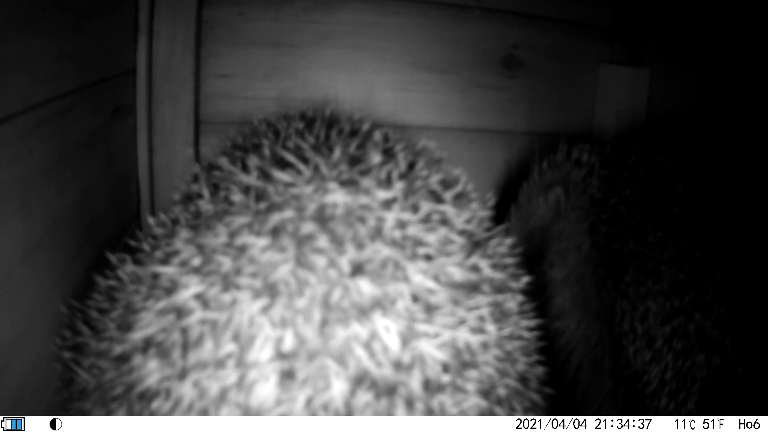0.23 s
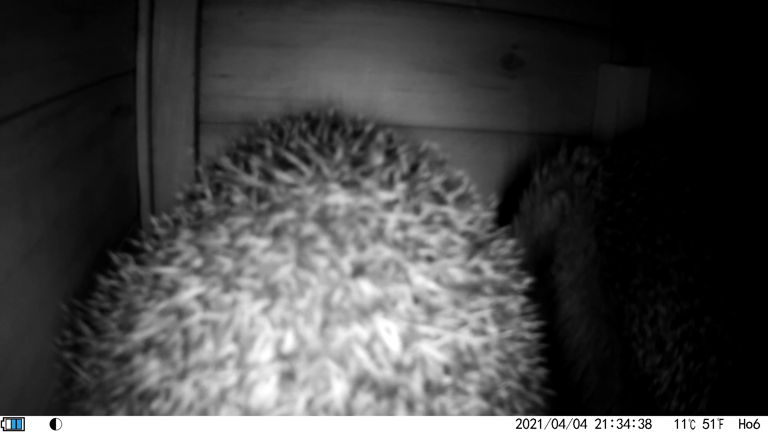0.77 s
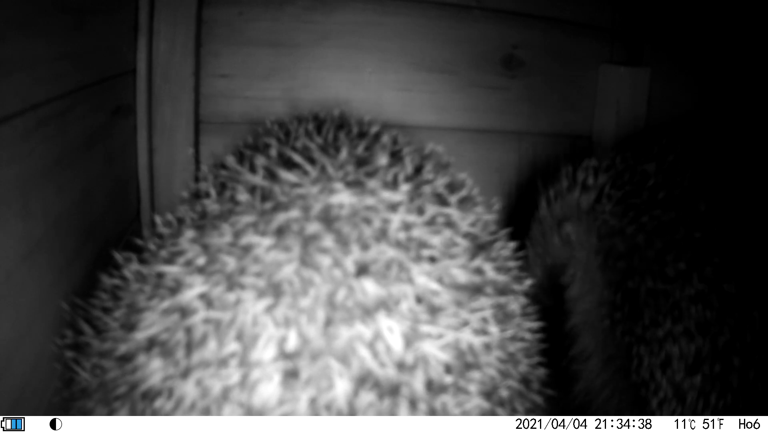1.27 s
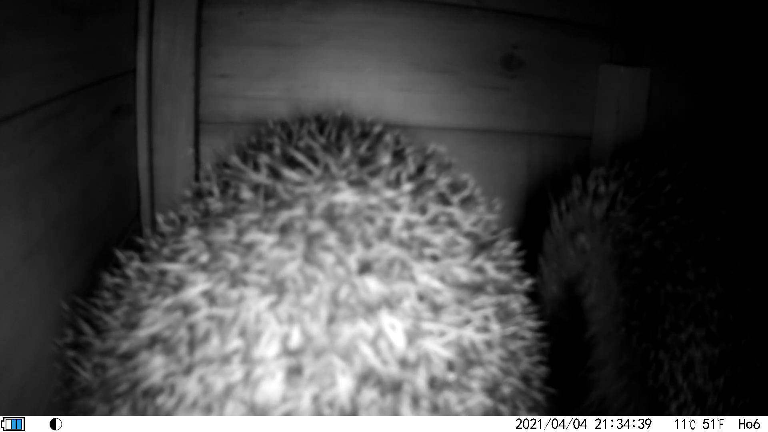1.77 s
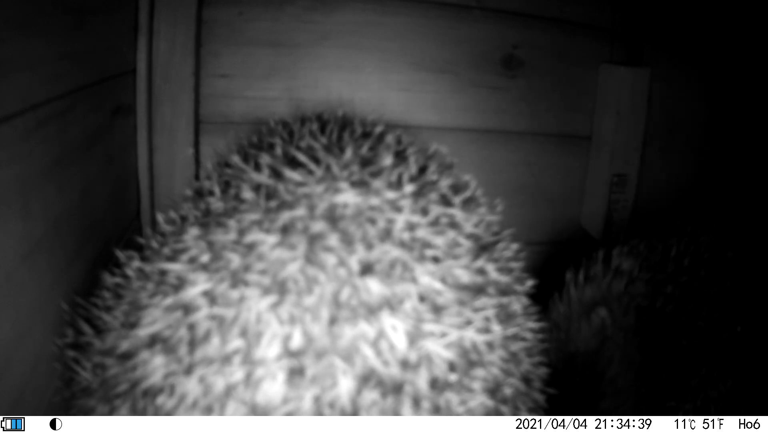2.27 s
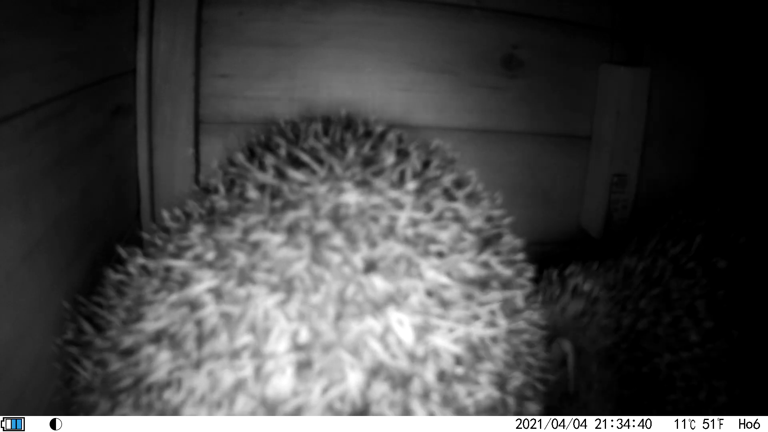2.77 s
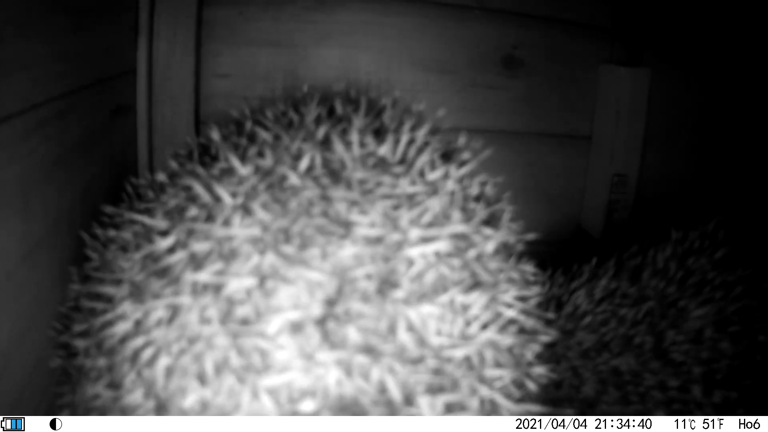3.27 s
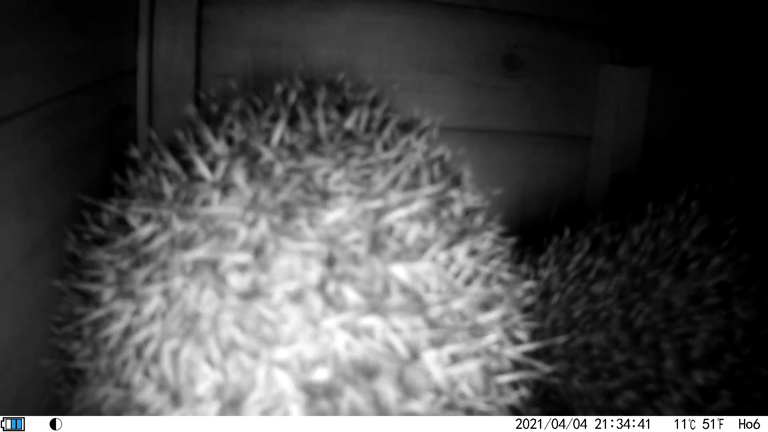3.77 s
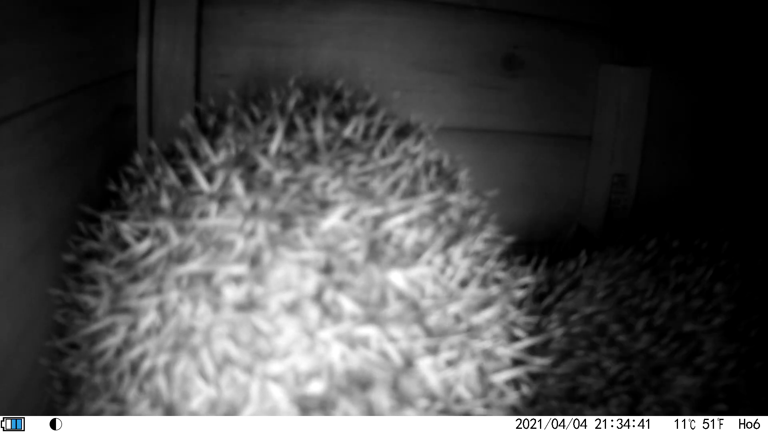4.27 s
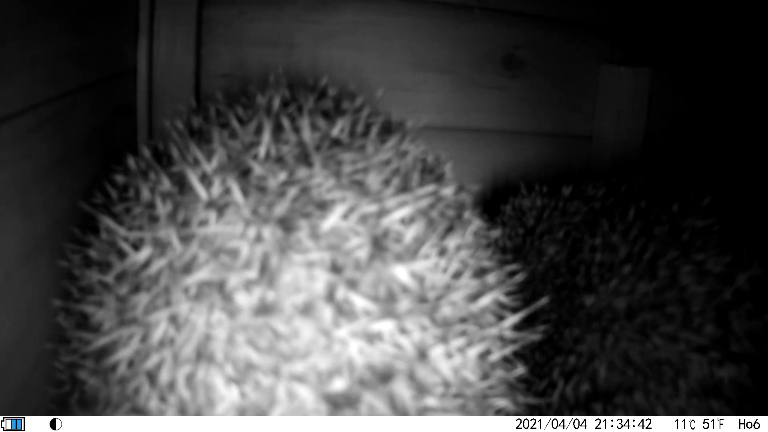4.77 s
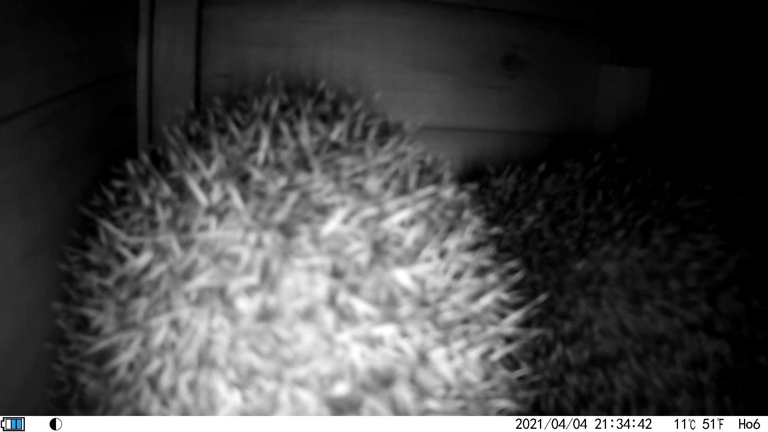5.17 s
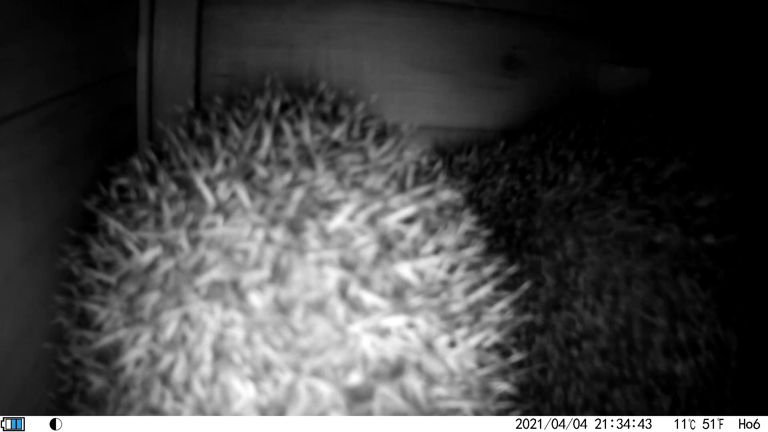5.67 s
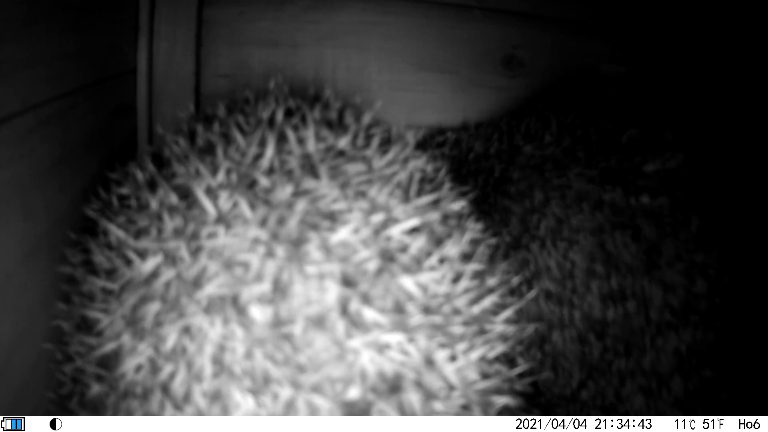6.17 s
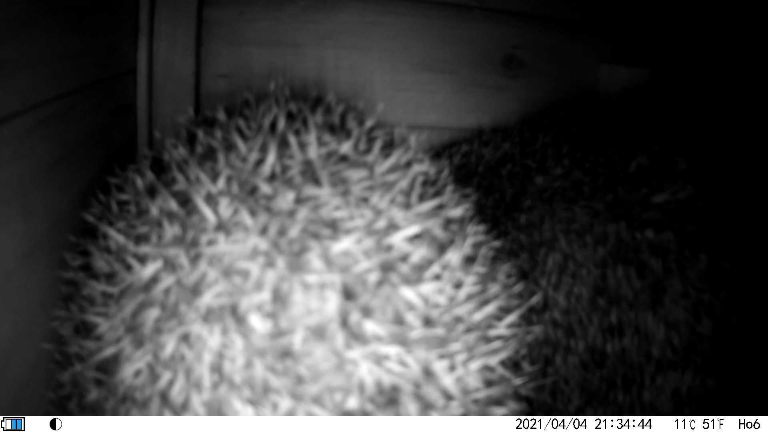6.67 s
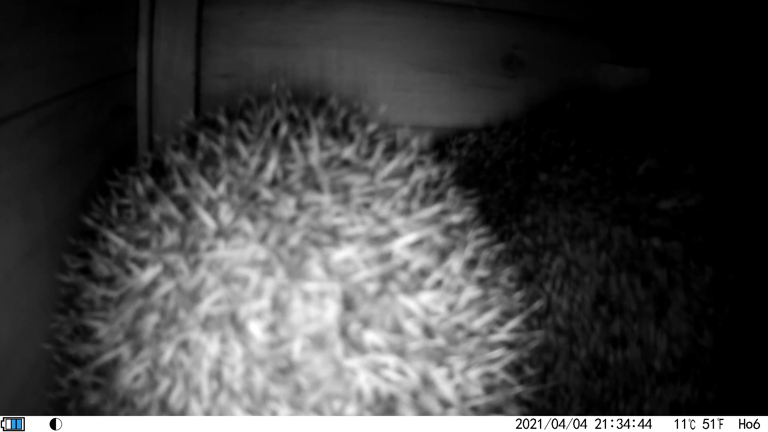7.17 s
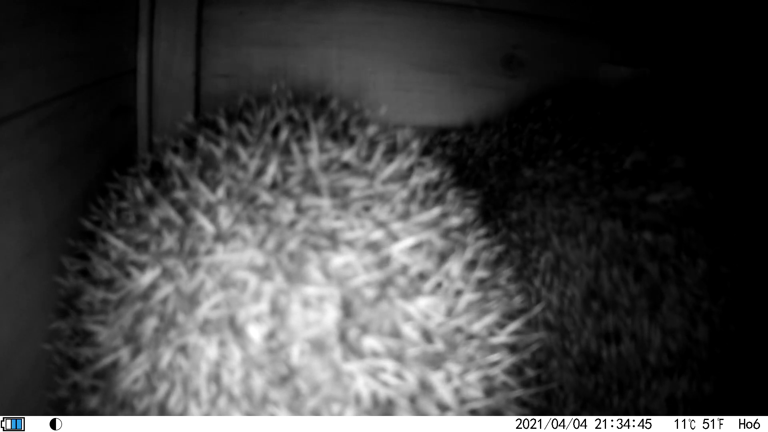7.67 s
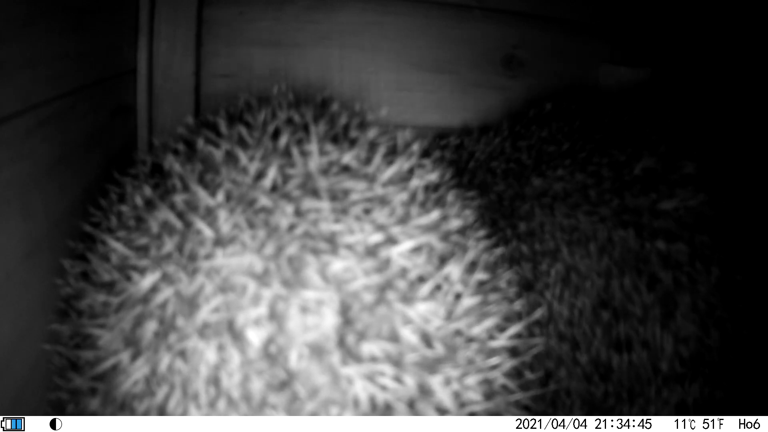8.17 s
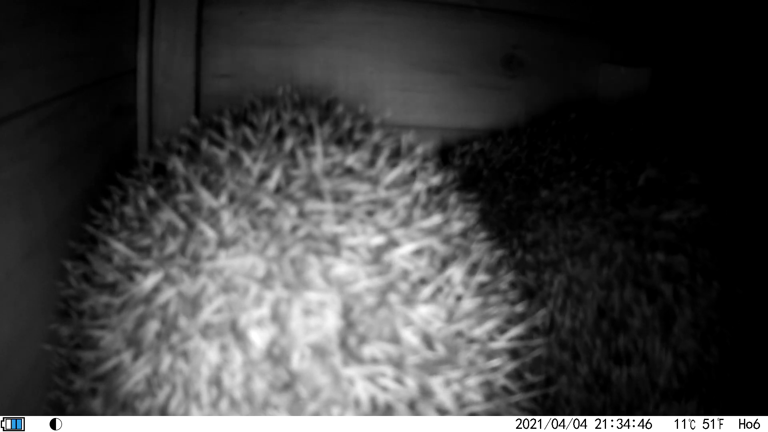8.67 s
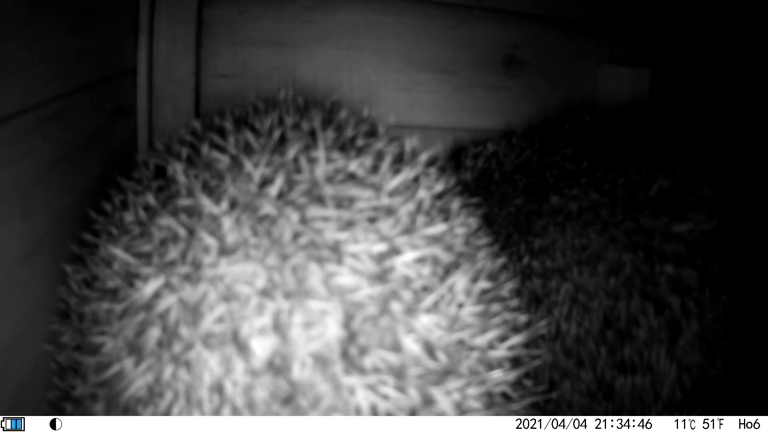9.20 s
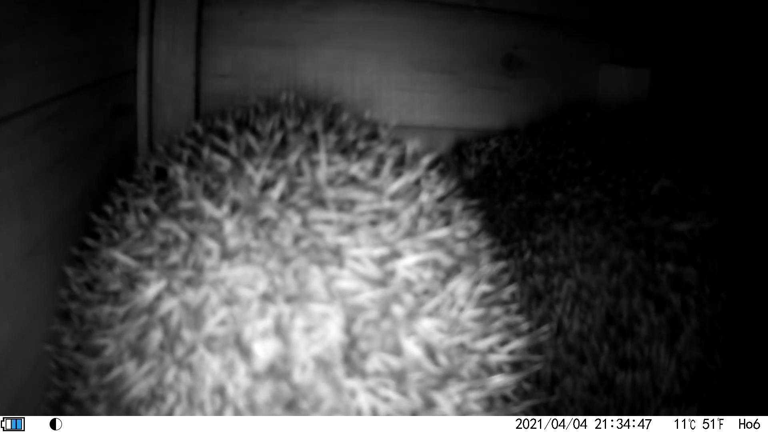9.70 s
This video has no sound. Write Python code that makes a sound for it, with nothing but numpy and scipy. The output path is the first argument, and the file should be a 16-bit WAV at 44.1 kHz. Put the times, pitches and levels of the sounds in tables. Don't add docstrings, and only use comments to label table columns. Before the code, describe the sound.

Two hedgehogs crunch dry pellets in a small wooden box, then a loud hollow burst of knocks and spiny scraping, then crunching again.

```python
import sys
import numpy as np
from scipy import signal
from scipy.fft import rfft, irfft
from scipy.io import wavfile
from scipy.ndimage import uniform_filter1d

SR = 44100
rng = np.random.default_rng(int(sys.argv[2]) if len(sys.argv) > 2 else 0)


def magnitude_from_level(level_db):
    exponent = np.asarray(level_db, float) / 20
    return 10 ** exponent


def to_wav(sig):
    pcm = np.clip(np.atleast_2d(sig), -1, 1) * 32767
    pcm = np.round(pcm).astype(np.int16)
    wavfile.write(sys.argv[1], SR, pcm.T)


N = 438354


def rms_one(x):
    return x / np.sqrt(np.mean(x ** 2) + 1e-20)


def resonate(x, hz, width_hz):
    r = np.exp(-np.pi * width_hz / SR)
    zeros = np.sqrt((1 - r * r) / 2) * np.array([1, 0, -1])
    poles = [1, -2 * r * np.cos(2 * np.pi * hz / SR), r * r]
    return signal.lfilter(zeros, poles, x + 1e-18)


# freq_hz, density_db_per_hz
HISS = [(12, -41), (20, -6.5), (95, -9), (119, -10), (192, -15), (335, -22), (655, -26), (733, -29.5),
        (797, -25), (916, -29), (2000, -32), (4250, -33), (5940, -34), (13000, -33), (15800, -31.5)]
# time_s, rumble_db, engine_drone_db
RUMBLE = [(0, -66.5, -60), (1, -62, -70), (1.5, -66, -81), (3, -64.5, -73.5), (4.199, -61.5, -83),
          (5.001, -61, -80), (6.3, -62.5, -71), (7.001, -60.5, -69), (8.001, -61, -71), (8.6, -63, -76),
          (9, -61, -64.5), (9.94, -60.5, -62)]


def background():
    hiss_db, bass_hz, drone_hz, drone_width_hz = -61, 260, 93.4, 6.4
    hz, density_db = np.array(HISS).T
    bins_hz = np.maximum(np.arange(N // 2 + 1) * SR / N, 1)
    tilt = magnitude_from_level(np.interp(np.log(bins_hz), np.log(hz), density_db))
    hiss = magnitude_from_level(hiss_db) * rms_one(irfft(rfft(rng.standard_normal(N)) * tilt, N))
    bass = signal.sosfiltfilt(signal.butter(2, bass_hz, fs=SR, output="sos"), hiss)
    drone = rng.standard_normal(N)
    for _ in range(2):
        drone = resonate(drone, drone_hz, drone_width_hz)
    time_s, rumble_db, drone_db = np.array(RUMBLE).T
    t = np.arange(N) / SR
    rumble = magnitude_from_level(np.interp(t, time_s, rumble_db)) * rms_one(bass)
    return hiss - bass + rumble + magnitude_from_level(np.interp(t, time_s, drone_db)) * rms_one(drone)


def ring(x, modes, dry_db, widen=1, strengths=None):
    if strengths is None:
        strengths = np.ones(len(modes))
    total = magnitude_from_level(dry_db) * x
    for k, (hz, width_hz, db) in enumerate(modes):
        total = total + (-1) ** k * magnitude_from_level(db) * strengths[k] * resonate(x, hz, widen * width_hz)
    band_hz = [.75 * modes[0][0], 1.17 * modes[-1][0]]
    return signal.sosfilt(signal.butter(3, band_hz, "band", fs=SR, output="sos"), total)


def contacts(start_s, peak_db, length_s, modes, dry_db, scatter_db=2.5, size=4000):
    box_t60_s, box_db = .05, -2
    t = np.arange(size) / SR
    shape = (len(start_s), size)
    grit = rng.standard_normal(shape) * magnitude_from_level(2.8 * np.minimum(rng.exponential(1, shape), 3))
    length_s = np.clip(length_s, .001, .025)[:, None]
    bursts = grit * (1 - np.exp(-t / .00013)) * np.exp(-(t / length_s) ** 1.5)
    walls = magnitude_from_level(box_db - 60 * t / box_t60_s) * (1 - np.exp(-t / .0017))
    bursts += walls * rng.standard_normal(shape)
    strengths = magnitude_from_level(scatter_db * rng.standard_normal((len(modes), len(start_s), 1)))
    rings = ring(bursts, modes, dry_db, strengths=strengths)
    rings *= magnitude_from_level(peak_db)[:, None] / np.abs(rings).max(1, keepdims=True)
    out = np.zeros(N + size)
    for s, one in zip(start_s, rings):
        out[round(s * SR):][:size] += one
    return out[:N]


# freq_hz, width_hz, level_db
PELLET = [(2730, 170, -16.5), (4240, 200, 3), (4590, 200, 3), (5050, 250, -3), (5300, 200, 0)]
AIR = [(798, 36, -1.5), (1180, 70, -9), (1450, 70, -10)]
BOARDS = [(1577, 56, .5), (1690, 70, 3), (1930, 162, .5), (2157, 90, 3.5), (2290, 100, -2.5),
          (2600, 300, -12)]
SIZZLE = [(7040, 300, -11.5), (8030, 400, -1), (9820, 600, -6.5), (11000, 900, -11), (12600, 600, -24),
          (14600, 1200, -10)]
# start_s, peak_db, boards_rel_db,
# brittleness_rel_db, length_s
BITES = [(1.087, -47, -14, -14, .006), (1.6945, -36, -40, -23, .0043), (2.0742, -40, -15, -28, .0071),
         (2.1301, -36.5, -12, -11, .012), (6.7084, -40, -1, -15, .0048), (6.7156, -37, -8.5, -17, .006),
         (6.7805, -35, -33, -16.5, .0062), (7.002, -38.5, -7.5, -23.5, .0065),
         (7.3028, -42.5, -12, -16.5, .0071), (7.3382, -41, -20, -23, .006), (7.6041, -31, -19, -16, .005),
         (7.9189, -44, -24, -17, .0055), (8.6288, -31, -12, -17, .01), (8.9316, -30.5, -22, -13, .0079),
         (8.9434, -40, -17, -3, .0044), (9.0069, -30.5, -7, -13.5, .0025),
         (9.0648, -27.5, -12.5, -12, .0031), (9.2654, -43.5, -15, -16, .012),
         (9.3317, -41.5, -11.5, -12, .006), (9.3631, -41.5, -13, -10, .006),
         (9.4389, -37.5, -11.5, -17, .0043), (9.6445, -41.5, -11, -10.5, .016),
         (9.6959, -44, -6.5, -9, .0045), (9.9014, -40.5, -9, -13.5, .011)]
# start_s, peak_db
QUIET_BITES = [(.2074, -56), (.7342, -56), (1.6267, -52), (1.7779, -58), (2.6554, -54), (2.6938, -47.5),
               (2.7212, -55), (2.7506, -52), (4.1051, -57), (6.5121, -54), (6.537, -50), (7.0434, -55),
               (7.2559, -50), (7.2654, -48.5), (7.5148, -54), (7.5552, -58), (7.5747, -48), (7.868, -56),
               (7.893, -47.5), (7.9443, -54), (8.35, -56), (8.969, -56), (9.1007, -54), (9.3214, -50),
               (9.3901, -46.5), (9.4215, -50), (9.622, -49), (9.8765, -49.5), (9.8859, -49.5), (9.9194, -49)]


def crunching():
    boards_db, brittle_db, length_s = -12, -13, .0065
    quiet_bites = [(s, db, boards_db, brittle_db, length_s) for s, db in QUIET_BITES]
    s, db, boards, brittle, length = np.array(BITES + quiet_bites).T
    air_db = -59 + .75 * (db + 40)
    pellet = contacts(s, db - 3.2, length, PELLET, dry_db=7.5, size=2500)
    sizzle = contacts(s, db + brittle + 5, length, SIZZLE, dry_db=.5, size=2000)
    air = contacts(s, air_db + 7.5, length, AIR, dry_db=-10)
    board = contacts(s, db + boards + 1.5, length, BOARDS, dry_db=26, size=2500)
    return pellet + sizzle + air + board


def swells(peak_s, peak_db, rise_s, fall_s):
    roundness = 1.5
    level, t = np.zeros(N), np.arange(N) / SR
    for s, db, rise, fall in zip(peak_s, peak_db, rise_s, fall_s):
        near = slice(int((s - 3 * rise) * SR), int((s + 3 * fall) * SR))
        away = np.maximum((s - t[near]) / rise, (t[near] - s) / fall)
        level[near] += magnitude_from_level(db - 20 * away ** roundness)
    return level


def dragging(slips, level, modes, dry_db, lift_db):
    return magnitude_from_level(lift_db) * level * rms_one(ring(slips, modes, dry_db, widen=1.5))


def slipping():
    slips_per_s = np.array([[2000], [5000], [8000]])
    chance = rng.standard_normal((4, N // 250 + 1))
    clumps_db = np.repeat(3 * chance[0] + 3 * chance[1:], 250, axis=1)[:, :N]
    clumps = magnitude_from_level(uniform_filter1d(clumps_db, size=200))
    sizes = magnitude_from_level(2.6 * np.minimum(rng.exponential(1, (3, N)), 4)) * rng.choice([-1, 1], (3, N))
    return clumps * sizes * (rng.random((3, N)) < slips_per_s / SR)


# freq_hz, width_hz, level_db
PANEL = [(40, 40, -11), (100, 20, -4), (142, 30, 4), (185, 45, 0), (345, 40, -11), (410, 60, -14)]
CAVITY = [(565, 45, -11), (655, 23, -8), (783.6, 45, -3.5), (957, 40, -3.5), (1060, 75, -9), (1186, 60, -3)]
BRIGHT = [(2850, 200, -8), (3500, 200, -7), (4350, 770, 1), (5340, 150, 1), (5686, 300, -16)]
# peak_s, force_db, panel_weight_rel_db, rise_s_per_20db, fall_s_per_20db
SCUFFLE = [(2.835, -44, 5, .015, .1), (2.87, -35, 7, .045, .25), (2.95, -32, 9, .1, .1),
           (3.055, -27, .5, .07, .06), (3.12, -36, 15, .08, .09), (3.27, -55, 14, .1, .07),
           (3.4, -61, 17, .1, .04), (3.487, -36, -2.5, .012, .12), (3.55, -34, 16.5, .05, .07),
           (3.63, -32, .1, .15, .25), (3.75, -33, 8, .15, .08), (3.775, -29, -5, .08, .06),
           (3.86, -39, 3, .1, .12), (3.95, -56, 3, .1, .07), (4.36, -51, 6, .04, .2),
           (4.45, -36, 4, .09, .1), (4.55, -41, 4, .15, .15)]
# peak_s, force_db, panel_weight_rel_db, rise_s_per_20db, fall_s_per_20db
SHIFTS = [(.97, -64.5, 5, .04, .2), (1.19, -59, 22, .04, .18), (1.93, -70, 13, .15, .4),
          (2.11, -52, 11, .04, .09), (4.05, -72, 14, .1, .3), (4.75, -64, 6, .2, .3),
          (4.87, -63, 11, .15, .15), (5.29, -61, 3, .1, .2), (5.42, -55, 18, .2, .1),
          (5.651, -66, 18, .15, .25), (5.88, -62, 5, .15, .2), (6.0, -63, 15, .06, .1),
          (6.25, -69, 14, .3, .4)]
# peak_s, level_db, rise_s_per_20db, fall_s_per_20db
BRUSHES = [(1.19, -69, .08, .15), (2.13, -66, .07, .1), (2.9, -49, .07, .12), (2.98, -42, .1, .12),
           (3.1, -43, .12, .08), (3.24, -59, .12, .09), (3.4, -66, .1, .08), (3.5, -57, .025, .1),
           (3.565, -45, .06, .1), (3.67, -42, .1, .1), (3.79, -49, .1, .12), (3.94, -64, .1, .08),
           (4.45, -51, .1, .12), (4.54, -49, .1, .12), (4.8, -78, .2, .2), (5.35, -74, .2, .15),
           (5.88, -66, .05, .08), (6.28, -72, .04, .05)]


def shoving():
    coarse, fine, finest = slipping()
    s, db, weight, rise, fall = np.array(SCUFFLE + SHIFTS).T
    push, heavy = swells(s, db, rise, fall), swells(s, db + weight, rise, fall)
    brush = swells(*np.array(BRUSHES).T)
    return (dragging(coarse, push, CAVITY, dry_db=.5, lift_db=-1.5)
            + dragging(coarse, heavy, PANEL, dry_db=-6, lift_db=-7)
            + dragging(coarse, push, BOARDS, dry_db=8, lift_db=-7.5)
            + dragging(fine, brush, BRIGHT, dry_db=12, lift_db=-.2)
            + dragging(finest, brush, SIZZLE, dry_db=-3.5, lift_db=-5))


# start_s, peak_db, boards_rel_db, spines_rel_db, length_s
BLOWS = [(2.826, -38, -6, -14, .008), (2.913, -23, -10, -12, .006), (2.922, -22, -10, -10, .006),
         (2.951, -20, -8, -14, .006), (2.992, -11, -18, -22, .008), (3.051, -18, -8, -16, .005),
         (3.538, -25, -4, -20, .006), (3.571, -22, -8, -16, .005), (3.58, -25, -5, -18, .006),
         (3.66, -20, -8, -10, .008), (3.757, -18, -8, -24, .008), (3.807, -22, -5, -16, .008),
         (4.392, -33, -6, -14, .006), (4.412, -31, -8, -16, .006), (4.436, -28, -4, -14, .006),
         (4.489, -28, -6, -18, .005), (2.869, -17, -8, -42, .0054), (2.967, -5, -15, -20, .014),
         (2.9705, -.5, -22.5, -21.5, .0084), (3.022, -5, -10, -17.5, .0031), (3.033, -25, 3, 2, .0047),
         (3.067, -14.5, -15, -7, .002), (3.094, -13.5, -3.5, -7.5, .0042), (3.104, -34.5, -1, 13.5, .0076),
         (3.133, -18, 3, 2, .0049), (3.2, -24.5, -4.5, -15, .01), (3.263, -23.5, 3.5, -3, .0033),
         (3.349, -25, -4.5, -29, .0044), (3.485, -21, -6.5, -14, .013), (3.502, -14.5, -24, -29, .0022),
         (3.618, -32.5, 7.5, 2.5, .0065), (3.642, -9, -17, -19.5, .007), (3.689, -6, -9, -15, .002),
         (3.708, -17, -33, -21, .0076), (3.728, -15.5, -.5, -12.5, .0081), (3.824, -9, -14, -26, .006),
         (4.505, -15.5, -10.5, -33, .005), (4.527, -30, 4.5, -3.5, .016), (4.563, -23, -11, -27, .002),
         (4.596, -21, -13.5, -8, .0071)]
# start_s, peak_db, panel_weight_rel_db, hardness_rel_db
MORE_KNOCKS = [(3.242, -38, -20, -6), (3.334, -42, -20, -4), (3.848, -27, -20, -6), (3.868, -31, -20, -6),
               (3.903, -36, -15, -10), (3.995, -44, -15, -4), (4.105, -48, -15, -8), (4.373, -36, -15, -10),
               (4.63, -38, -15, -6), (4.709, -48, -15, -6), (5.42, -42, -10, -8), (5.698, -50, -12, -6),
               (5.865, -48, -15, -4), (5.915, -50, -15, -6), (5.985, -45, -12, -6), (6.075, -51, -15, -8),
               (6.171, -56, -12, -10), (6.306, -57, -12, -10), (6.454, -55, -12, -6), (1.012, -46, -9, -24),
               (1.086, -36.5, -12, -7), (1.104, -37, -4.5, -12), (1.161, -26.5, -4.5, -20), (2.089, -32, .5, -25),
               (2.104, -36, -16, -7), (2.989, -18, -29, -22), (3.293, -25, -23, -12), (3.38, -34.5, -20, -2.5),
               (3.414, -31.5, -17, -11), (3.432, -45, -2, -6), (3.717, -28, -20, -4), (3.967, -34, -9, -9),
               (4.654, -38.5, -11, -9), (4.773, -44.5, -8.5, -18), (4.808, -39, -22, -14.5),
               (4.837, -44.5, -8.5, -7), (5.191, -45.5, -24.5, -9), (5.228, -42, -17, -11), (5.24, -41, -2.5, -8),
               (5.295, -34, -18, -3.5), (5.339, -31.5, -15, -9), (5.372, -36.5, -9, -6), (5.612, -35, -3.5, -3),
               (5.787, -45.5, -6, -9.5), (5.884, -48.5, -10, -2), (5.957, -30.5, 4.5, -17.5), (6.049, -46, -4, -6),
               (7.69, -49, -12, -15), (7.846, -49, 1.5, -16)]


def knocking():
    blow_weight_db, knock_length_s, knock_spines_db, panel_delay_s, sizzle_db = -16, .005, -14, .0022, -7.5
    blows = [(s, db, blow_weight_db, boards, spines, length) for s, db, boards, spines, length in BLOWS]
    more_knocks = [(s, db, weight, hard, hard + knock_spines_db, knock_length_s) for s, db, weight, hard in MORE_KNOCKS]
    s, db, panel, boards, bright, length = np.array(blows + more_knocks).T
    bright_db = db + bright
    return (contacts(s, db - 4.2, length, CAVITY, dry_db=5.5)
            + contacts(s + panel_delay_s, db + panel - 2, length, PANEL, dry_db=-22)
            + contacts(s, 1.4 * db - 9.5, .8 * length, AIR[:1], dry_db=-20)
            + contacts(s, db + boards + 2, length, BOARDS, dry_db=11, size=2500)
            + contacts(s, bright_db - 1.2, length, BRIGHT, dry_db=6.5, size=2000)
            + contacts(s, bright_db + sizzle_db + 2, length, SIZZLE, dry_db=-2.5, size=2000))


# start_s, peak_db, pitch_hz
NOTES = [(1.085, -35, 773), (1.164, -27, 799), (2.089, -33, 789), (2.869, -17, 770), (2.921, -21, 789),
         (2.973, -1, 789), (2.992, -8, 773), (3.023, -6, 1150), (3.05, -13, 1190), (3.068, -13, 557),
         (3.093, -9, 807), (3.135, -9, 1550), (3.202, -22, 810), (3.263, -17, 2120), (3.292, -26, 972),
         (3.351, -23, 1560), (3.378, -28, 1600), (3.413, -29, 958), (3.504, -15, 789), (3.537, -19, 813),
         (3.578, -17, 810), (3.62, -14, 2120), (3.645, -10, 778), (3.689, -6, 778), (3.717, -14, 1130),
         (3.729, -11, 923), (3.756, -13, 807), (3.808, -12, 915), (3.827, -8, 972), (3.966, -32, 1590),
         (4.391, -29, 805), (4.445, -23, 802), (4.505, -16, 937), (4.531, -19, 1550), (4.562, -22, 1130),
         (4.597, -20, 824), (4.653, -40, 961), (4.808, -43, 953), (4.837, -40, 958), (5.191, -46, 762),
         (5.24, -42, 912), (5.297, -33, 791), (5.338, -30, 794), (5.371, -38, 810), (5.612, -34, 778),
         (5.785, -48, 1600), (5.87, -43, 775), (5.961, -31, 662), (6.048, -47, 805)]
# start_s, peak_db, pitch_hz
CRACK_NOTES = [(1.6924, -49, 1190), (6.7111, -39, 1460), (6.78, -46, 2860), (7.0015, -45, 2200),
               (7.6036, -43, 2160), (8.6283, -37, 1170), (8.9331, -43, 2300), (9.0069, -36, 2290),
               (9.0648, -37, 1170), (9.2648, -53, 1200), (9.3636, -52, 2270), (9.4354, -45, 2290),
               (9.645, -52, 2260), (9.9004, -47, 1170)]
# start_s, peak_db, pitch_hz
PINGS = [(1.087, -44, 4200), (2.925, -38, 9500), (3.135, -14, 2100), (3.487, -30, 2750), (3.655, -25, 2880),
         (3.689, -22, 5200), (3.709, -22, 2700), (3.729, -14, 1580), (3.733, -25, 5150), (4.598, -28, 4550),
         (4.531, -26, 2150)]
# start_s, peak_db, pitch_hz
SHELL_PINGS = [(1.6945, -39, 4430), (6.7084, -39, 5070), (6.7805, -37, 4550), (7.0025, -43, 4610),
               (7.3028, -44, 4570), (7.3344, -44, 5110), (7.6014, -35, 5110), (7.9189, -46, 4340),
               (8.6288, -34, 4520), (8.9316, -34, 4550), (9.0069, -34, 4520), (9.0648, -33, 4560),
               (9.2644, -46, 4210), (9.3322, -48, 4510), (9.3631, -46, 4530), (9.4354, -41, 4490),
               (9.645, -46, 4190), (9.6959, -49, 4620), (9.9014, -42, 4550)]


def notes():
    level_db, decay_cycles, extra_s, attack_s, size = -6.5, 24, .02, .0012, 4000
    out, t = np.zeros(N + size), np.arange(size) / SR
    attack = 1 - np.exp(-t / attack_s)
    for s, db, hz in NOTES + CRACK_NOTES + PINGS + SHELL_PINGS:
        t60_s = decay_cycles / hz + extra_s
        decay = magnitude_from_level(db + level_db - 60 * t / t60_s)
        out[round(s * SR):][:size] += decay * attack * np.sin(2 * np.pi * hz * t)
    return out[:N]


def scene():
    return (background() + crunching() + shoving() + knocking() + notes())[None]


def band_limit(x):
    return signal.sosfilt(signal.butter(12, 15940, fs=SR, output="sos"), x)


# start_s, end_s
DROPOUTS = [(1.138, 1.165), (1.682, 1.709), (3.122, 3.15), (3.251, 3.278), (3.345, 3.373), (3.473, 3.501),
            (3.667, 3.693), (4.597, 4.623), (5.298, 5.357), (5.585, 5.645), (5.938, 5.965), (6.706, 6.797),
            (6.994, 7.021), (7.601, 7.629), (8.626, 8.653), (8.914, 9.069), (9.426, 9.453)]


def record(dry):
    cutoff_hz, dropout_hz = 16170, 8800
    lowpass = signal.cheby2(12, 70, cutoff_hz + 250, fs=SR, output="sos")
    loud = signal.sosfilt(lowpass, .9 * np.tanh(dry / .9))
    dulling = signal.cheby2(10, 30, dropout_hz + 300, fs=SR, output="sos")
    dulled = signal.sosfiltfilt(dulling, loud)
    i = np.arange(N)
    lost = sum((i > start_s * SR) & (i < end_s * SR) for start_s, end_s in DROPOUTS)
    lost = uniform_filter1d(lost.astype(float), size=130)
    return band_limit(loud + lost * (dulled - loud))


dry = scene()
out = record(dry)
to_wav(out)
```